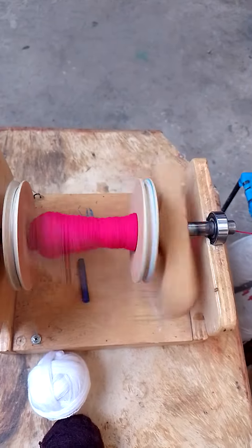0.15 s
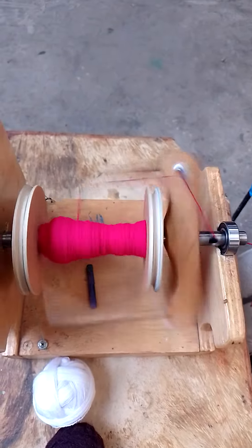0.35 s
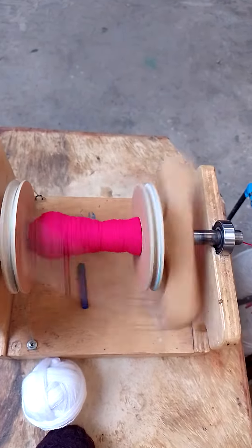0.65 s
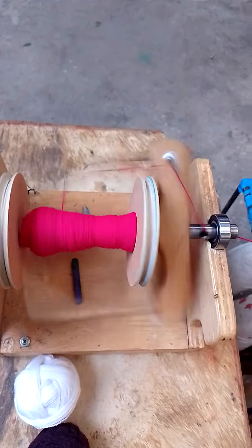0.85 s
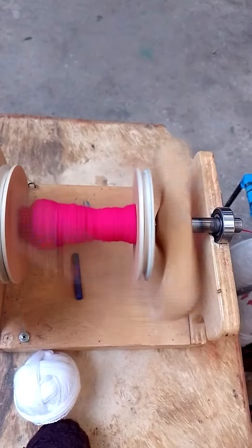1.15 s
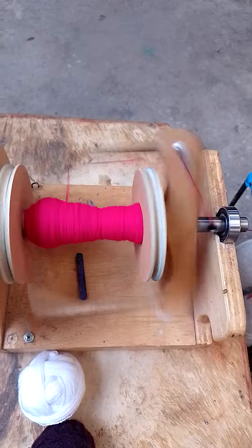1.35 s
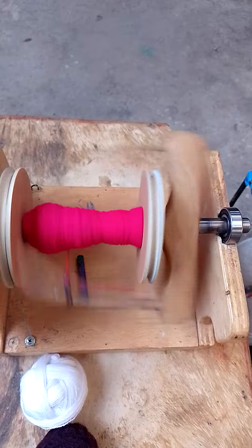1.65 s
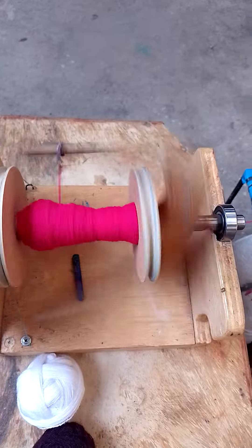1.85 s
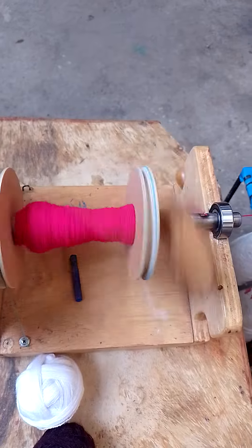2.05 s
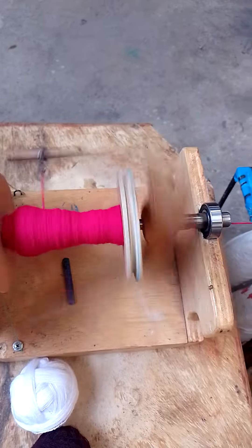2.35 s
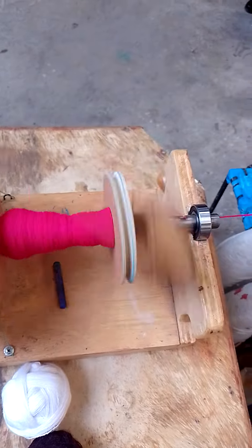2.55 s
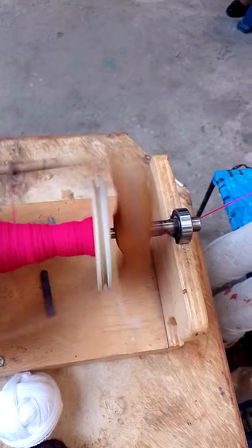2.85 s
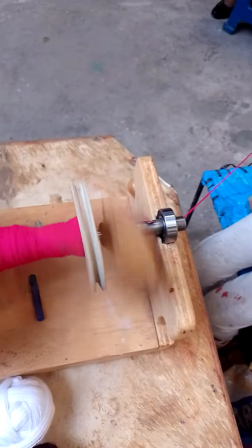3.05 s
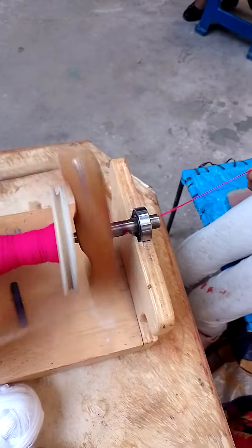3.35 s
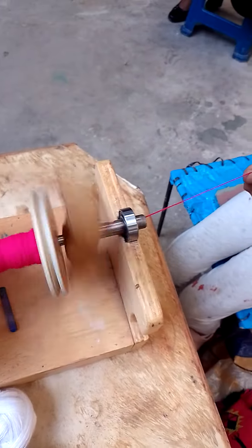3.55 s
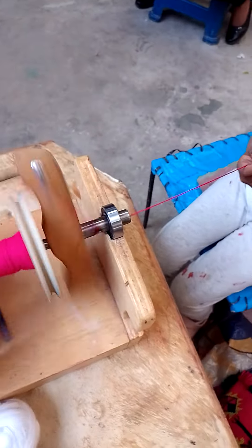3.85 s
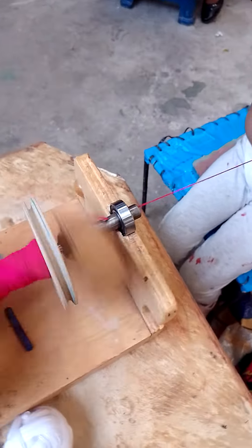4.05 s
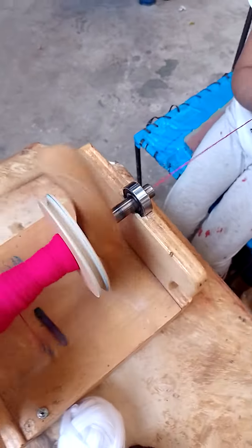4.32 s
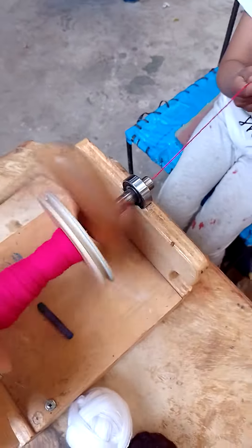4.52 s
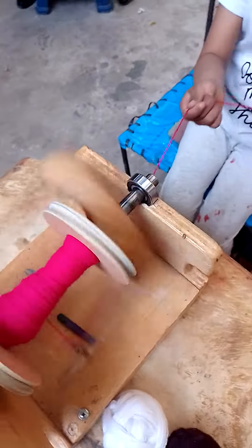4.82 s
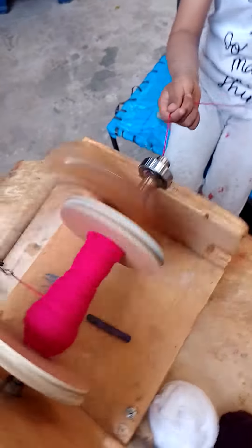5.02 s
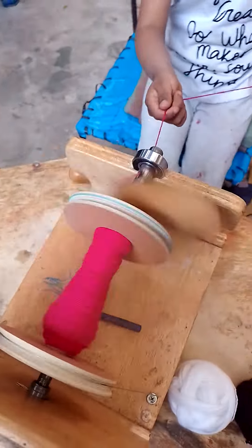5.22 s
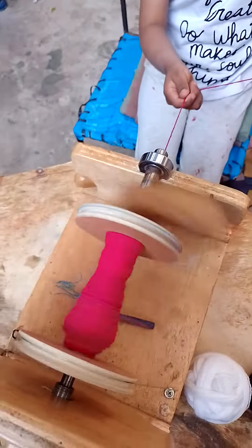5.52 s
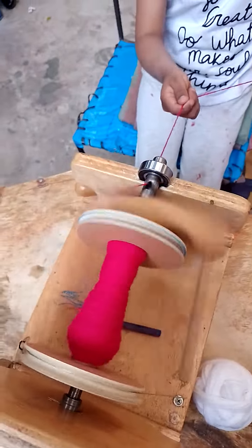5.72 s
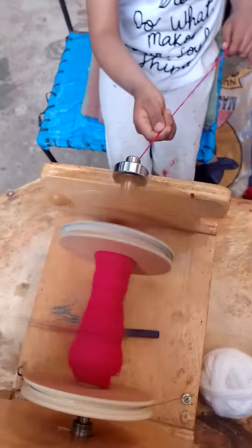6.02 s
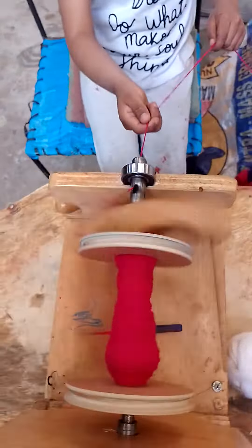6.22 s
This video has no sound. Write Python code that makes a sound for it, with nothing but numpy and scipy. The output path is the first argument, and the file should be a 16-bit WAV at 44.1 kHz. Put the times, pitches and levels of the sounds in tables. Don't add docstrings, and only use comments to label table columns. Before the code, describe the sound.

Continuous close whirring from a spinning yarn winder on a wooden board: rough hissing brushes, a fast-fluttering motor whine, soft low rumble and rapid tiny hook clicks. Sharper ticks cluster around the middle. As the handheld phone swings from the front to the end, the tone shifts from hissy and thin to fuller and more resonant, briefly swelling near five seconds, then squealing more plainly at the close.

```python
import sys
import numpy as np
from scipy import signal
from scipy.fft import rfft, irfft, next_fast_len
from scipy.io import wavfile
from scipy.ndimage import uniform_filter1d, minimum_filter1d, map_coordinates

SR = 44100
rng = np.random.default_rng(int(sys.argv[2]) if len(sys.argv) > 2 else 0)


def dump(signal):
    limited = np.clip(np.atleast_2d(signal).T, -1, 1)
    pcm = np.round(limited * 32767).astype(np.int16)
    wavfile.write(sys.argv[1], SR, pcm)


def gain_from_db(level_db):
    decades = np.asarray(level_db, float) / 20
    return 10 ** decades


N = 281358

# share of the lap, commutator gain f/Hz
BELT_UNEVENNESS = [(0.0, 32.4), (0.056, -15.0), (0.111, 18.9), (0.167, -2.8), (0.222, -31.9), (0.278, 11.3),
                   (0.333, -10.7), (0.389, -23.7), (0.444, -40.6), (0.5, -20.8), (0.556, 8.6),
                   (0.611, -20.9), (0.667, 9.5), (0.722, 1.8), (0.778, -9.9), (0.833, 35.3), (0.889, 27.3),
                   (0.944, 15.0)]
# t/s, commutator f/Hz, flyer lead/turns, swing from lopsided load f/Hz, belt lead/laps
DRIVE = [(0.0, 642, 0.13, 17.6, 0.02), (0.49, 645, 0.07, 21.7, 0.022), (0.98, 647, 0.1, 25.3, 0.025),
         (1.47, 634, 0.1, 24.7, 0.02), (1.96, 639, 0.01, 25.9, 0.003), (2.45, 647, 0.03, 17.3, 0.006),
         (2.94, 641, -0.02, 17.3, 0.003), (3.44, 650, 0.02, 18.7, 0.006), (3.93, 633, 0.04, 15.8, 0.002),
         (4.42, 654, 0.07, 4.7, 0.002), (4.91, 639, 0.12, 6.5, 0.016), (5.4, 634, 0.24, 3.8, 0.012),
         (5.89, 647, 0.32, 5.6, 0.015), (6.38, 631, 0.43, 9.0, 0.015)]


def motor():
    belt_laps_per_s = 2.507
    steady_hz, _, lopsided_hz, lead_laps = curves(DRIVE)
    lap = belt_laps_per_s * np.arange(N) / SR + lead_laps
    belt_hz = np.transpose(BELT_UNEVENNESS)[1]
    swing_hz = map_coordinates(belt_hz, [lap % 1 * len(belt_hz)], mode="grid-wrap")
    swing_hz = swing_hz + lopsided_hz * np.cos(2 * np.pi * flyer())
    slack = np.tanh((swing_hz - uniform_filter1d(swing_hz, size=SR // 8)) / 25)
    braking_db = -0.27 * np.gradient(swing_hz) * SR / 100
    load_db = braking_db - 0.12 * swing_hz
    saturates_db = 8
    load_db = np.minimum(load_db, saturates_db * np.tanh(load_db / saturates_db))
    count = np.cumsum(steady_hz + swing_hz) / SR
    return count, slack, braking_db, load_db


def flyer():
    turns_per_s = 12.04
    return turns_per_s * np.arange(N) / SR + curves(DRIVE)[1]


def whine(tones, count, slack, swing_db):
    phase = 2 * np.pi * count + 0.1 * wobble(90)
    lines = 0
    for multiple, db, share in tones:
        lines = lines + gain_from_db(db + share * swing_db + 1.2 * wobble(40)) * np.sin(multiple * phase)
    return lines + gain_from_db(1.8 * slack) * patchy(rng.standard_normal(N), depth_db=2.18)


# multiple of the bar rate, level over the noise/dB, share of the braking swing (0-1)
LOW_TONES = [(1.8, -20, 0), (2, -6.5, .45)]
# f/Hz, level/dB per Hz
HOUSING_RESONANCES = [
    [(800, -45), (950, -52), (1050, -19.5), (1120, 3), (1190, 3.5), (1260, -6), (1340, -10.5), (1450, -8.5),
     (1540, -16.5), (1700, -14.5), (1800, -7), (1920, -21), (2050, -27), (2400, -53)],
    [(800, -40), (950, -28), (1050, -23), (1130, 4), (1200, 0.5), (1270, -11), (1345, -3.5), (1450, -4),
     (1540, -8), (1700, -11), (1850, -17), (1950, -24), (2050, -41), (2400, -48)],
    [(800, -11), (950, 3), (1050, -7), (1120, 9.5), (1200, -4), (1260, -2), (1335, 3.5), (1450, 7),
     (1550, 3), (1700, -0.5), (1850, 4), (1950, -6.5), (2050, -40), (2400, -42)],
]


def housing(count, slack, swing_db):
    level = gain_from_db(by_side([-22, -19.5, -22.5, -25]))
    return level * heard(whine(LOW_TONES, count, slack, swing_db), HOUSING_RESONANCES)


# multiple of the bar rate, level over the noise/dB, share of the braking swing (0-1)
HIGH_TONES = [(4, -24, .2), (5, -19, .3), (6, -21, .24)]
# f/Hz, level/dB per Hz
BEARING_RESONANCES = [
    [(1240, -35), (2100, 2), (2260, 5.5), (2390, 2.5), (2700, 5), (3000, 10.5), (3250, 9.5), (3470, 12.5),
     (3780, 4), (4140, 3), (4600, -16.5), (5980, -26), (10100, -120)],
    [(1240, -30), (2100, -8), (2250, -10), (2620, -3), (2990, -4), (3100, -5), (3300, 0), (3540, -5),
     (3640, -12), (4140, -5), (4600, -21), (5980, -39.5), (10100, -120)],
    [(1240, -21), (2100, -12.5), (2280, -15), (2430, -10.5), (2800, -11.5), (3090, 0), (3240, 3.5),
     (3470, 0), (3750, -11), (4090, -8), (4600, -22), (5980, -25), (10100, -120)],
]


def bearing(count, slack, swing_db):
    level = gain_from_db(by_side([-31.5, -30.5, -25.5, -22.5]))
    return level * heard(whine(HIGH_TONES, count, slack, swing_db), BEARING_RESONANCES)


# f/Hz, level/dB per Hz
BRUSH_SPECTRA = [
    [(3800, -45), (4400, -37), (4700, -27), (5250, -25), (5680, -5.5), (6250, -17), (6900, 2), (7550, -2.5),
     (8500, 5), (9350, -4), (9950, 2), (10800, -18), (11900, -23.5), (15800, -24)],
    [(2590, -33), (4400, -15), (5060, -22), (5390, -9), (5900, -10.5), (6680, 3.5), (7010, 4), (8450, -3),
     (8960, 4), (9920, -2), (10500, -11), (11200, -16), (13500, -17), (15100, -17), (15800, -42.5)],
    [(2590, -43), (4400, -14), (5510, -12), (6330, -14), (6640, -6), (6930, -15), (7470, -9), (7880, -5.5),
     (8680, 3), (9610, 3.5), (10600, -3.5), (11300, -8.5), (12800, -1), (14000, -12), (15800, -11)],
    [(2590, -39), (4400, -8), (5600, -17), (6070, -6), (6820, -4), (7720, -7), (8230, -14), (8410, -25),
     (9710, -2), (10400, 6), (11600, -11), (12400, -25), (14100, -16), (15100, -8), (15800, -18)],
]


def brushes(count, slack):
    bar = np.flatnonzero(np.diff(np.floor(count)))
    size, late = rng.standard_normal((len(bar), 2)).T
    sizes = gain_from_db(5 * np.clip(size, -2, 2))
    struck = np.clip(bar + np.round(6 * late).astype(int), 0, N - 1)
    contacts = np.bincount(struck, sizes, N)
    decay = gain_from_db(-60 * np.arange(200) / SR / 0.0051)
    gate = signal.fftconvolve(contacts, decay)[:N]
    bars_per_turn = 10
    throb = np.cos(2 * np.pi * count / bars_per_turn + 1.85 * wobble(4))
    swell = gain_from_db(1.5 * slack + 2.23 * throb + 1.12 * wobble(55))
    rattle = patchy(rng.standard_normal(N) * (1.2 + unit(gate)), depth_db=1.5)
    return gain_from_db(by_side([-24.5, -19, -19, -19.5])) * heard(swell * rattle, BRUSH_SPECTRA)


def squeal(count, load_db):
    hz = 3 * np.gradient(count) * SR
    cap_db = -0.1 * np.clip(hz - 1925, 0, None)
    level_db = by_side([-33, -30.5, -31.5, -18.5]) + load_db
    phase = 2 * np.pi * count + 0.1 * wobble(90)
    return gain_from_db(level_db + cap_db + 0.3 + 1.4 * wobble(60)) * np.sin(3 * phase)


# t/s, peak level/dB
HARD_TICKS = [(0.2448, -23), (1.1164, -23), (1.5524, -25), (1.6247, -24), (1.7943, -24), (1.9659, -22),
              (2.6728, -17), (2.7127, -23), (2.7576, -18), (2.8414, -17), (2.8828, -22), (2.9277, -23),
              (3.0106, -16), (3.0949, -15), (3.2136, -23), (3.2959, -19), (3.3797, -22), (3.6292, -22),
              (3.8033, -20), (3.8886, -23), (3.9709, -21), (4.0592, -21), (4.2068, -21), (4.3894, -21),
              (4.7177, -21), (4.7646, -20), (4.8753, -18), (4.9571, -22), (5.3857, -23), (6.0072, -21)]
# f/Hz, level/dB
HOOK_SPECTRUM = [(2000, -10), (3500, 3), (4600, -4), (5700, 6), (7000, 10), (9000, 12), (11000, 2),
                 (13000, -25), (16000, -23)]


def hook():
    out, t = np.zeros(N + SR), np.arange(SR // 50) / SR
    hook_at_turn = 0.69
    turns = np.flatnonzero(np.diff(np.floor(flyer() - hook_at_turn))) / SR
    late, size = rng.standard_normal((len(turns), 2)).T
    light_ticks = zip(abs(turns + 0.003 * late), -27.5 + 1.8 * size)
    for s, db in [*HARD_TICKS, *light_ticks]:
        attack = 1 - np.exp(-t / 0.0003)
        decay = gain_from_db(db + 7 - 60 * t / 0.015)
        out[round(s * SR):][:len(t)] += decay * attack * rng.standard_normal(len(t))
    return coloured(out[:N], HOOK_SPECTRUM)


# multiple of the bar rate, level over the noise/dB
BOARD_TONES = [(1, -25), (1.35, -20)]
# f/Hz, level/dB per Hz
BOARD_RESONANCES = [(15, -66), (25, -48), (60, -35), (156, -25.5), (200, -11.5), (264, -7.5), (309, -11),
                    (396, -3), (462, -2), (500, -5), (548, 2), (681, -9.5), (783, -4), (873, -2.5),
                    (1020, -1), (1330, -4.5), (2240, -120)]


def board(count):
    lines = 0
    for multiple, db in BOARD_TONES:
        lines = lines + gain_from_db(db + 1.5 * wobble(30)) * np.sin(2 * np.pi * multiple * count)
    lumps = gain_from_db(0.75 * wobble(10) + 1.8 * wobble(30)) * rng.standard_normal(N)
    return gain_from_db(by_side([-36, -34.5, -37, -37.5])) * unit(coloured(lines + lumps, BOARD_RESONANCES))


# t/s, length/s, loss/dB
LEVEL_DIPS = [
    (4.907, 0.036, 5.5),
    (4.999, 0.042, 5.5),
]


def dip_gain():
    t = np.arange(N) / SR
    loss_db = sum(db * ((t > s) & (t < s + length)) for s, length, db in LEVEL_DIPS)
    edge_s = 0.0087
    return gain_from_db(-uniform_filter1d(loss_db, size=round(edge_s * SR)))


# t/s, side (0 front, 1 corner, 2 end, 3 above the end), nearness level/dB
PHONE_PATH = [(0, 0.2, 0), (.35, .01, 0.1), (1.3, 0, 0.53), (2.5, 0, 0.6), (3.5, 0, 0.25),
              (3.75, -0.07, 0.2), (3.95, 0.6, -0.1), (4.3, 1.23, -0.1), (4.55, 1.26, 0), (4.8, 1.5, 1.4),
              (5.0, 1.98, 2), (5.25, 2, -.3), (5.85, 2, -0.2), (6.1, 2.5, -0.6), (6.38, 2.5, 0.7)]


def by_side(levels_db):
    side, near_db = curves(PHONE_PATH)
    return near_db + np.interp(side, np.arange(len(levels_db)), levels_db)


def heard(x, spectra):
    side = np.clip(curves(PHONE_PATH)[0], 0, len(spectra) - 1)
    mix = 0
    for k, spectrum in enumerate(spectra):
        mix = mix + np.clip(1 - abs(side - k), 0, 1) * coloured(x, spectrum)
    return unit(mix)


def coloured(x, spectrum):
    m = next_fast_len(N + 8192)
    hz, db = np.transpose(spectrum)
    log_hz = np.log(np.fft.rfftfreq(m, 1 / SR) + 1)
    gain = gain_from_db(np.interp(log_hz, np.log(hz + 1), db, -120, -120))
    return irfft(rfft(x, m) * unit(gain), m)[:N]


def patchy(x, depth_db):
    z = signal.stft(x, nperseg=256)[2]
    field = uniform_filter1d(rng.standard_normal(z.shape), size=8, axis=0)
    field = uniform_filter1d(field, size=7, axis=1)
    return signal.istft(z * gain_from_db(depth_db * unit(field)), nperseg=256)[1][:N]


def wobble(rate):
    knots = rng.standard_normal(int(N * rate / SR) + 4)
    return map_coordinates(knots, [np.arange(N) * rate / SR])


def curves(rows):
    s, *cols = np.transpose(rows)
    return [np.interp(np.arange(N) / SR, s, c) for c in cols]


def unit(x):
    return x / np.sqrt(np.mean(x ** 2) + 1e-20)


def scene():
    count, slack, braking_db, load_db = motor()
    swing_db = np.clip(braking_db - 4, -10, 0)
    machine = housing(count, slack, swing_db) + bearing(count, slack, swing_db)
    machine = machine + brushes(count, slack) + board(count) + hook()
    return (dip_gain() * machine + squeal(count, load_db))[None]


def roll_off(x):
    return signal.sosfilt(signal.butter(12, 16990, fs=SR, output="sos"), x)


def record(dry):
    needed = np.minimum(1, 0.68 / (abs(dry) + 1e-9))
    gain = uniform_filter1d(minimum_filter1d(needed, size=161), size=81)
    passed = np.fft.rfftfreq(N, 1 / SR) < 15720
    kept = irfft(rfft(dry * gain) * passed, N)
    return roll_off(kept)


dry = scene()
out = record(dry)
dump(out)
```